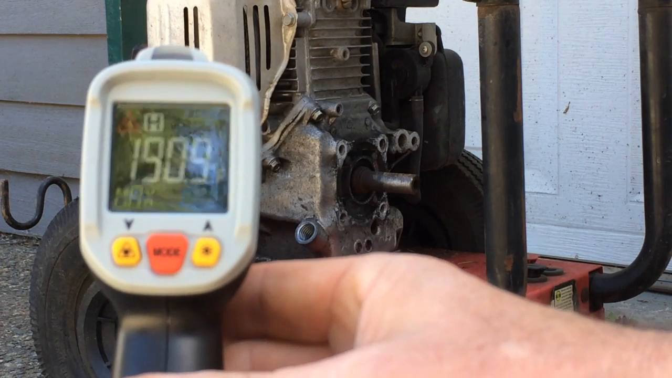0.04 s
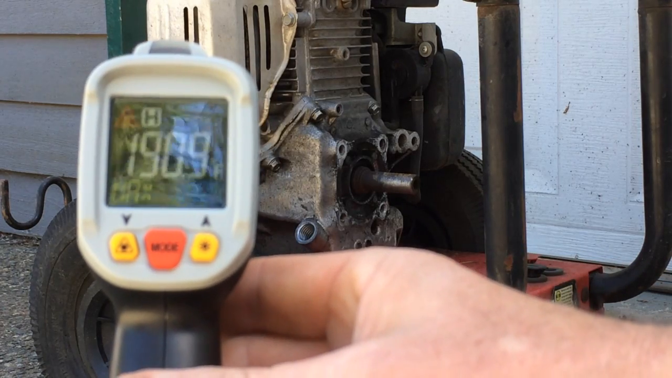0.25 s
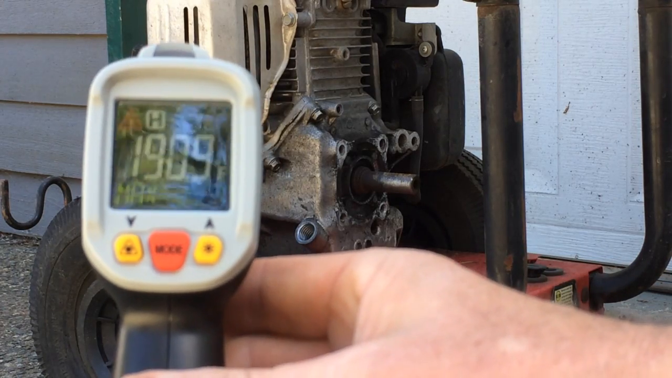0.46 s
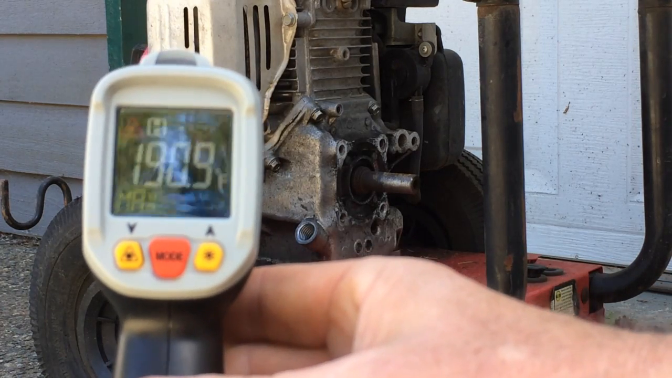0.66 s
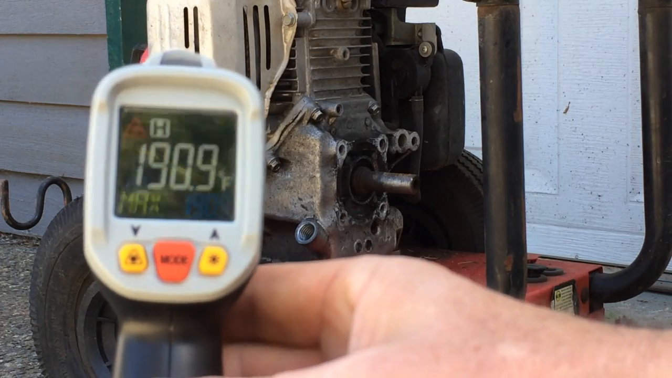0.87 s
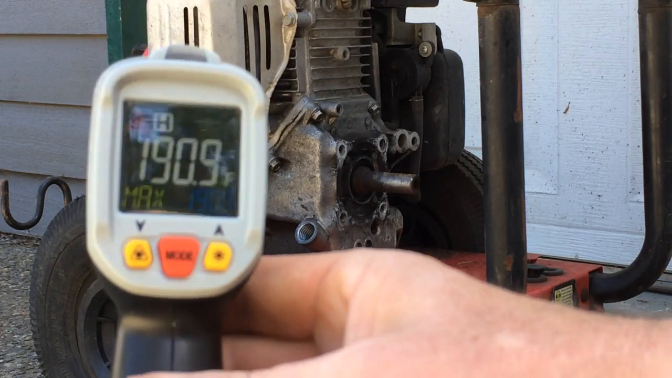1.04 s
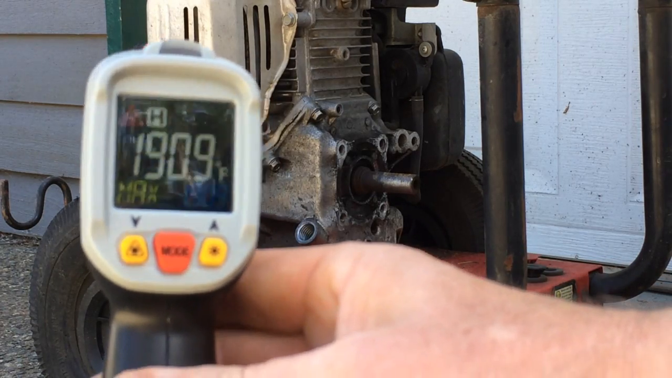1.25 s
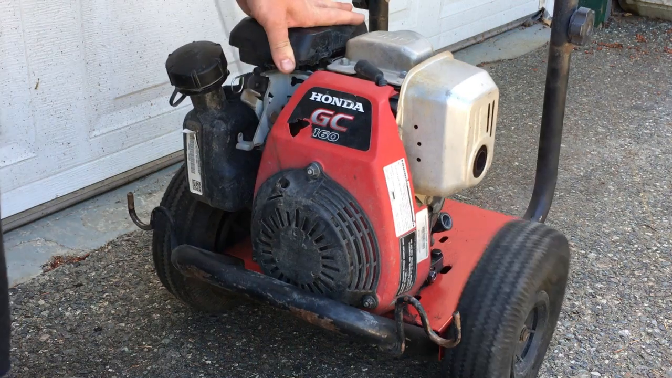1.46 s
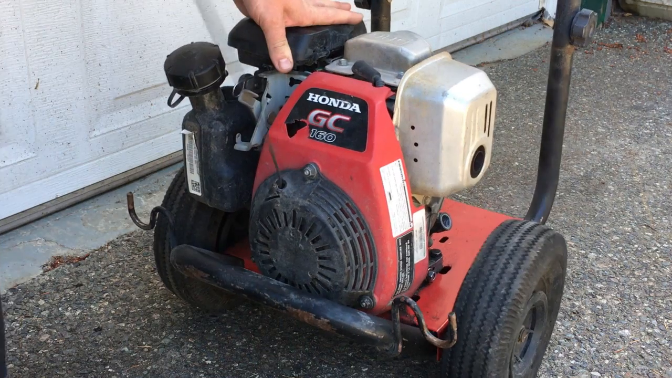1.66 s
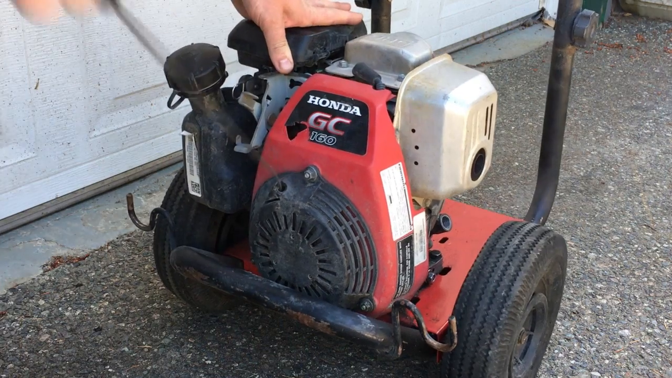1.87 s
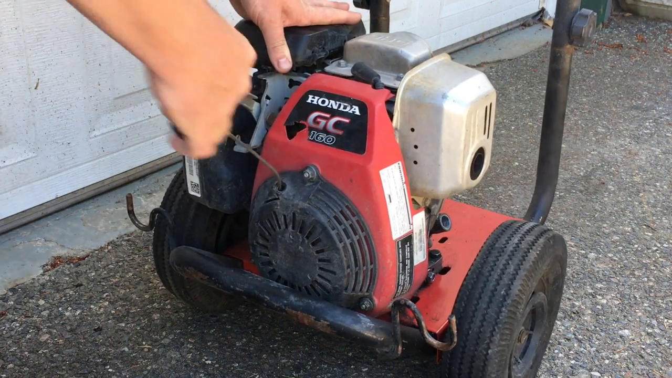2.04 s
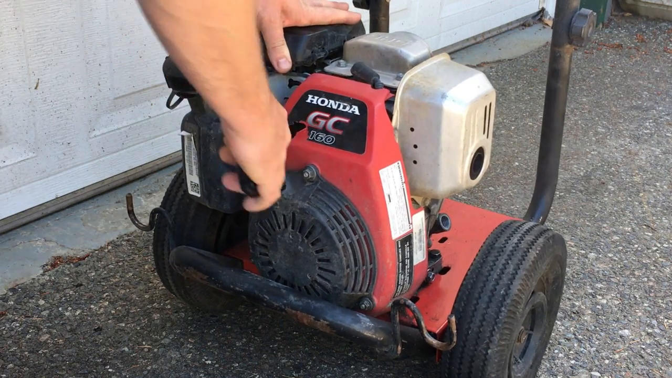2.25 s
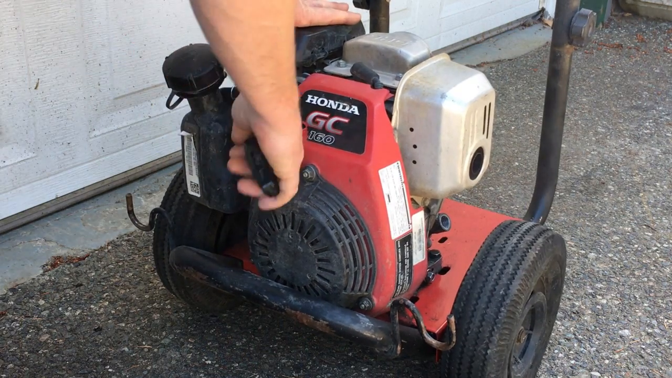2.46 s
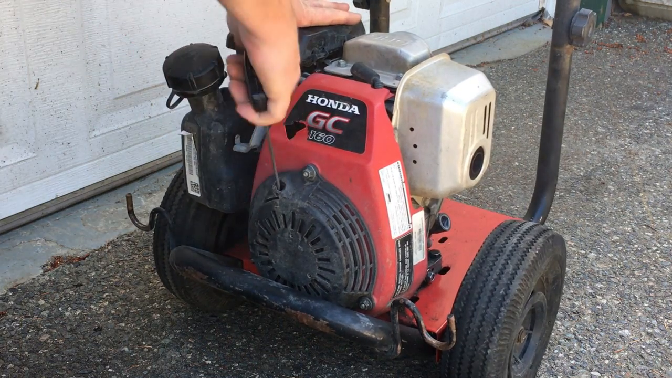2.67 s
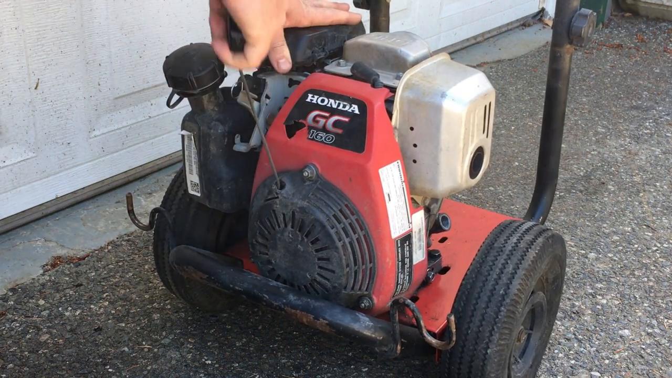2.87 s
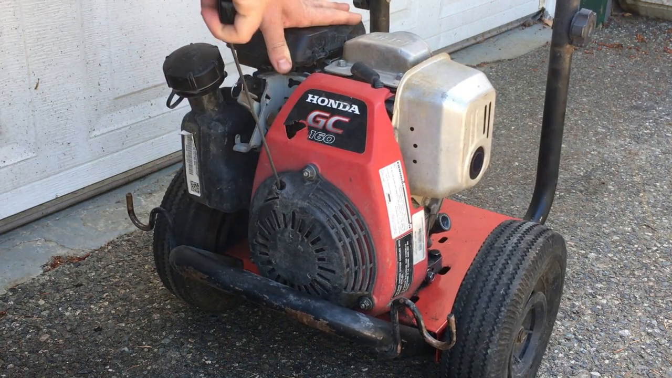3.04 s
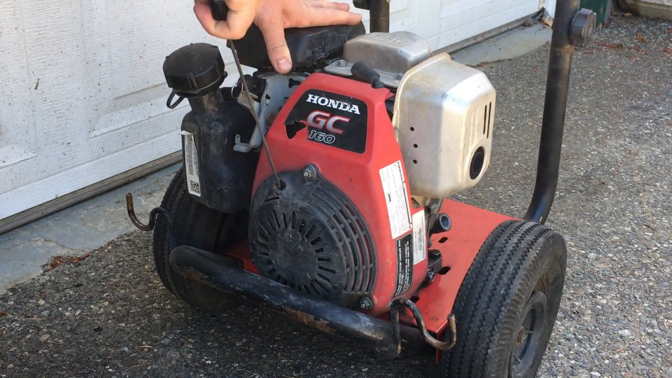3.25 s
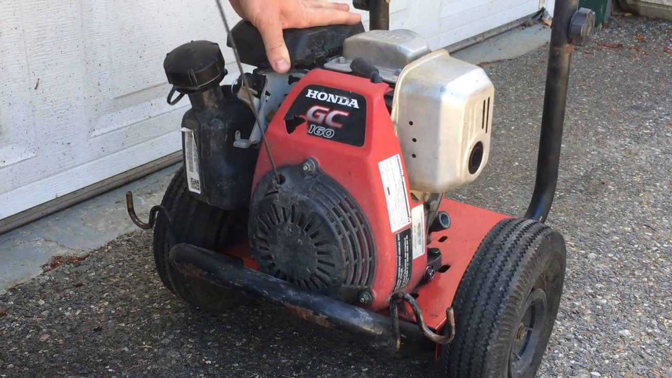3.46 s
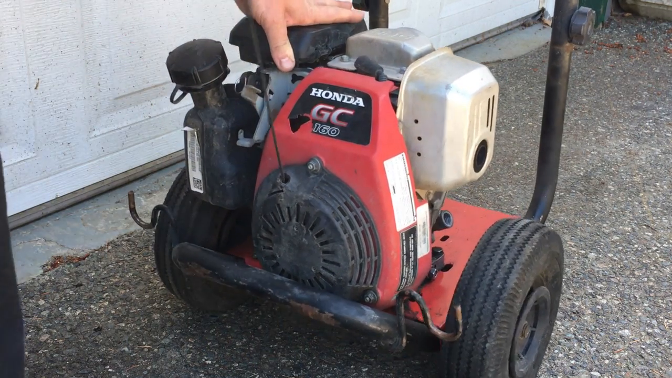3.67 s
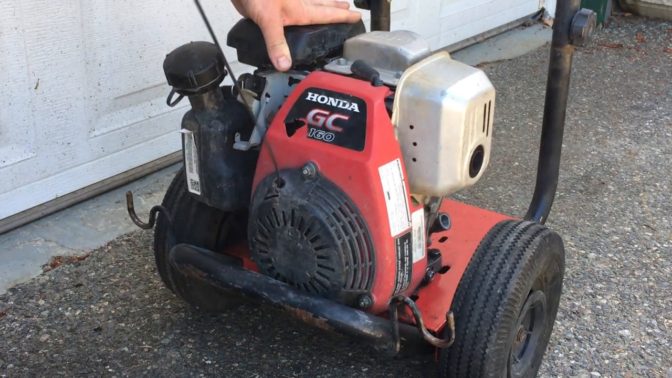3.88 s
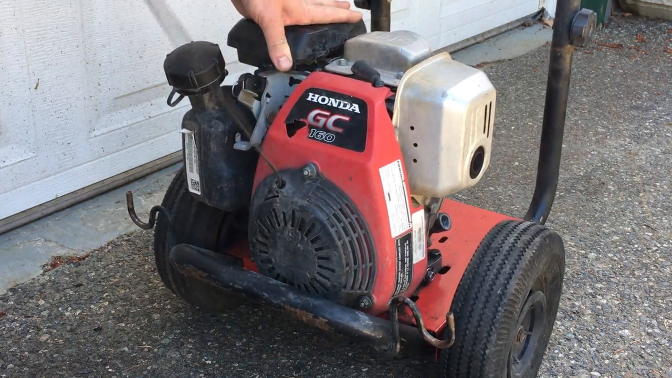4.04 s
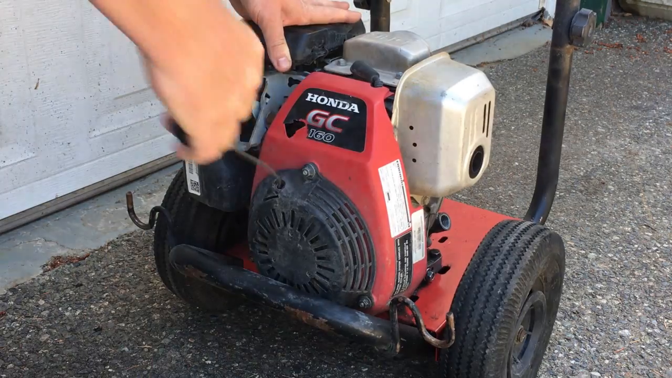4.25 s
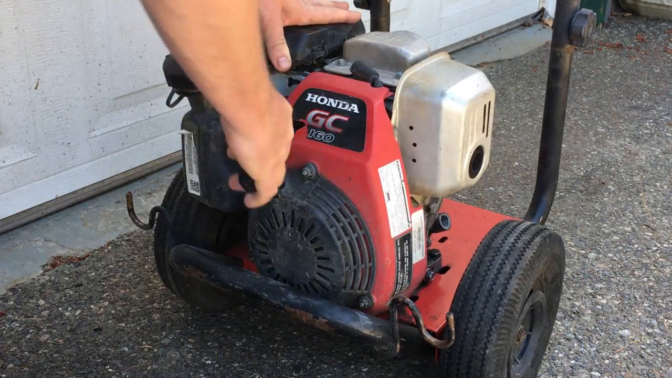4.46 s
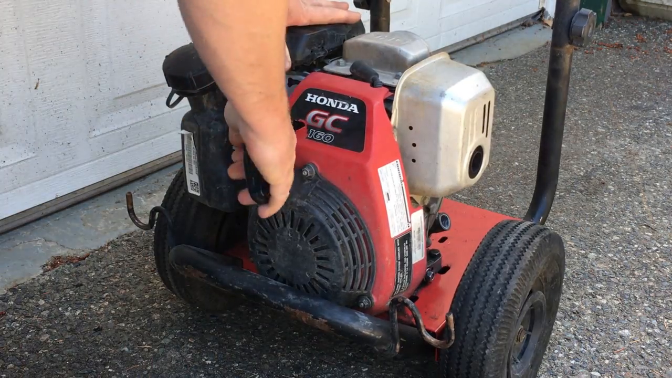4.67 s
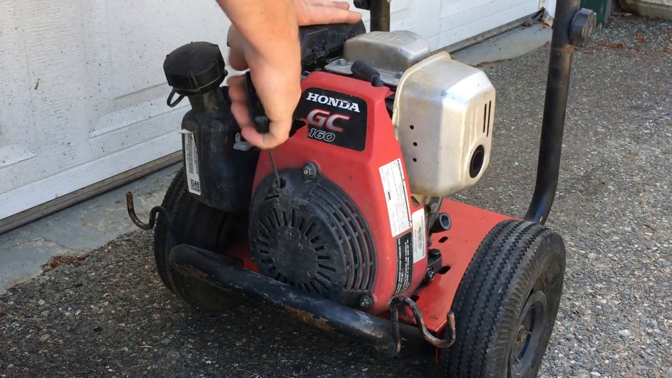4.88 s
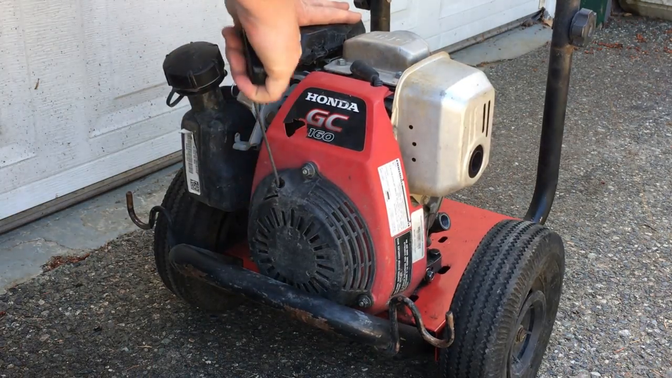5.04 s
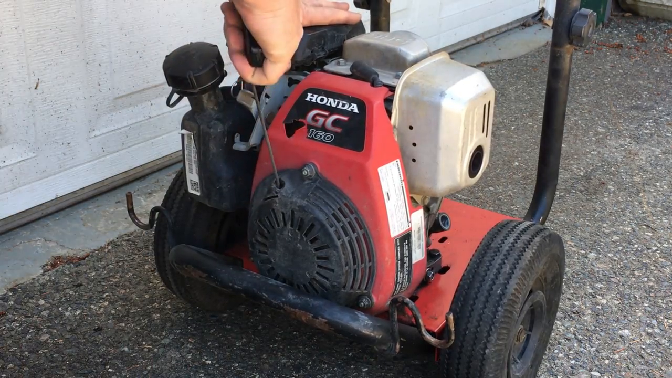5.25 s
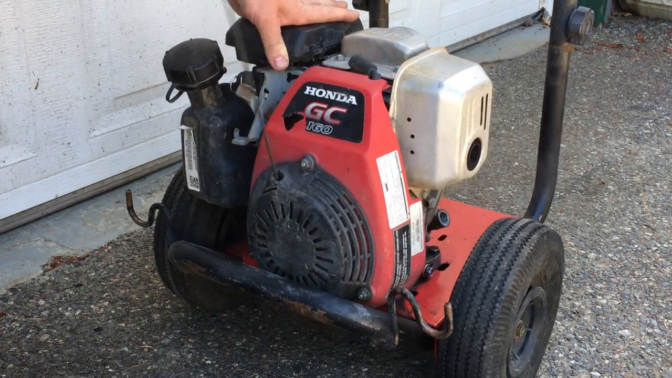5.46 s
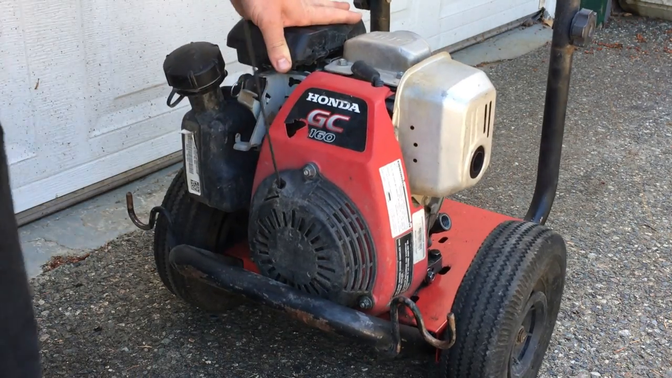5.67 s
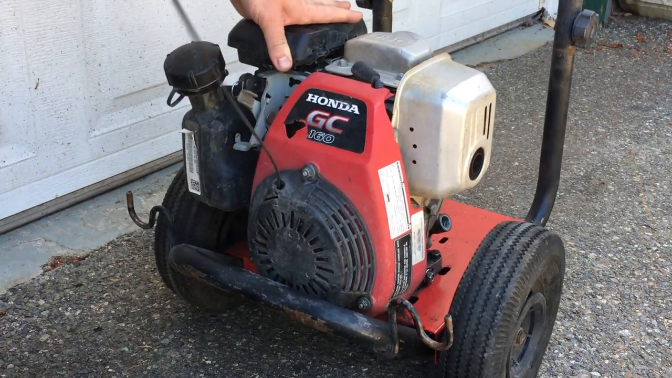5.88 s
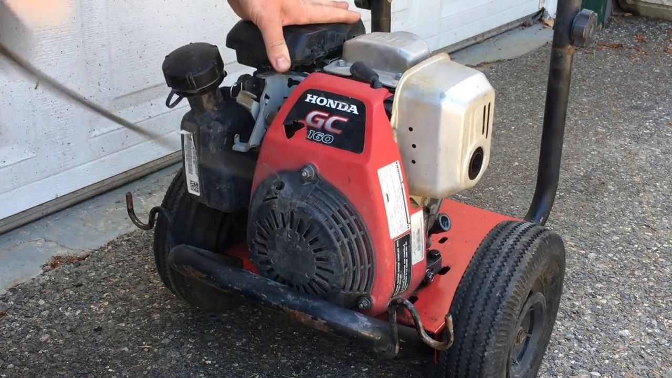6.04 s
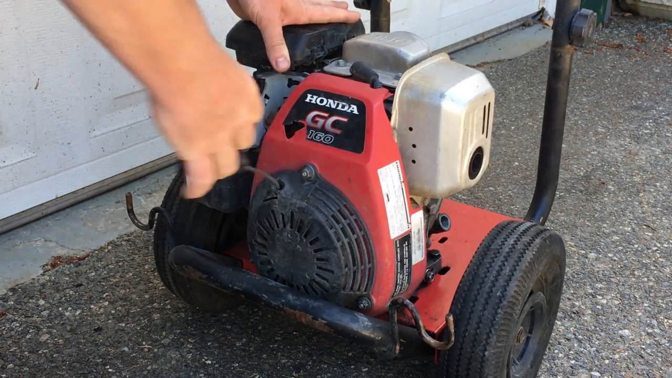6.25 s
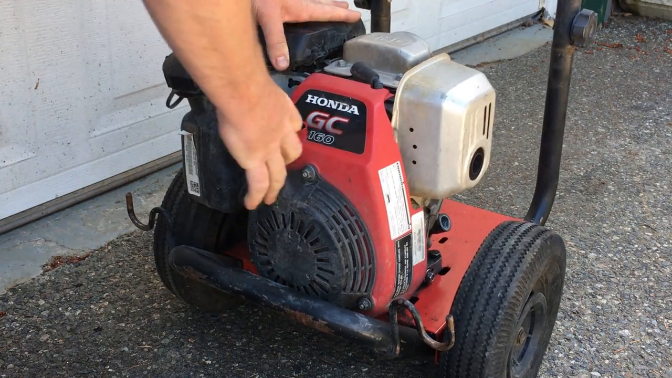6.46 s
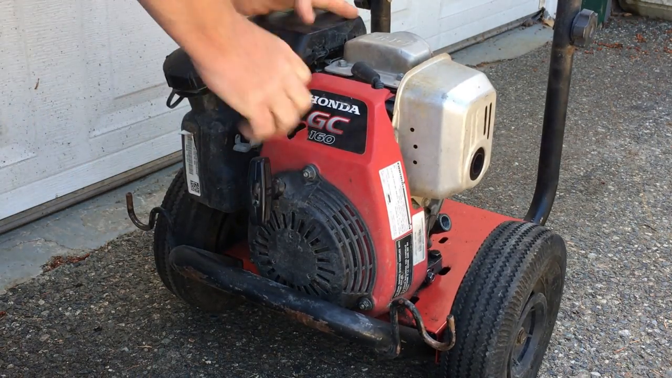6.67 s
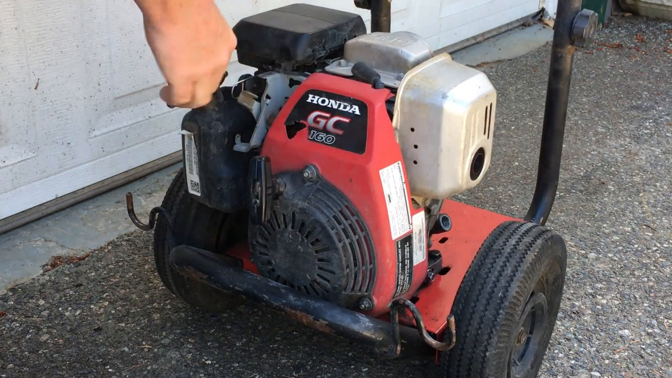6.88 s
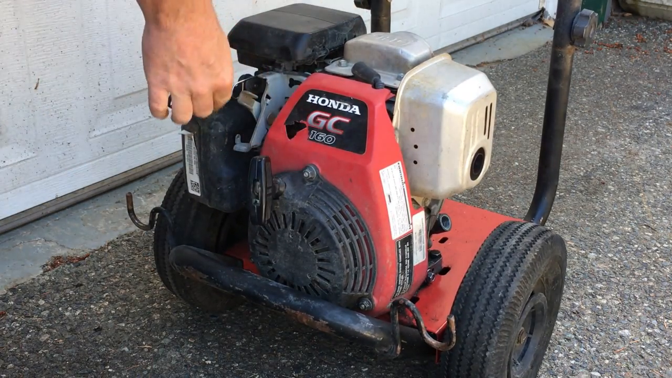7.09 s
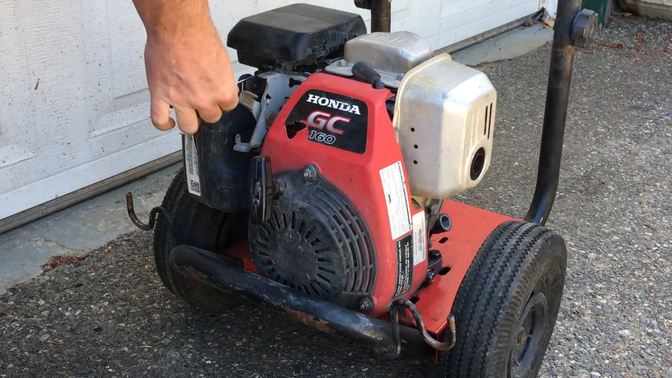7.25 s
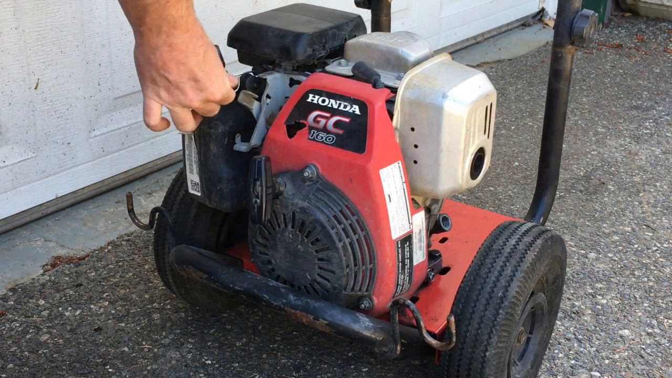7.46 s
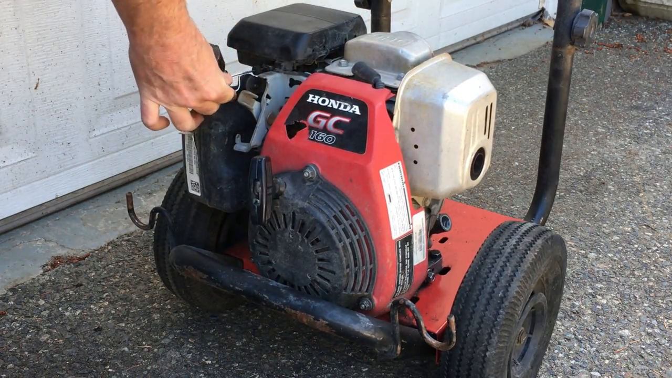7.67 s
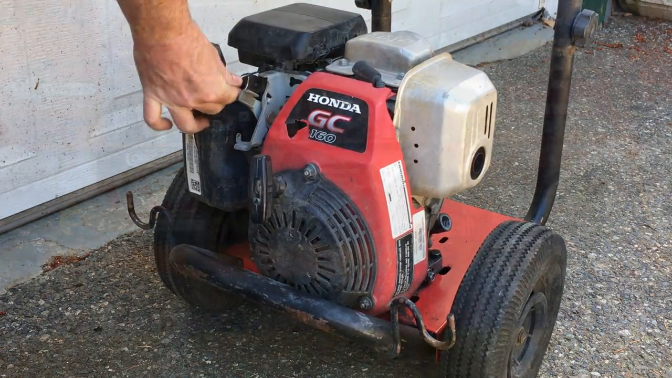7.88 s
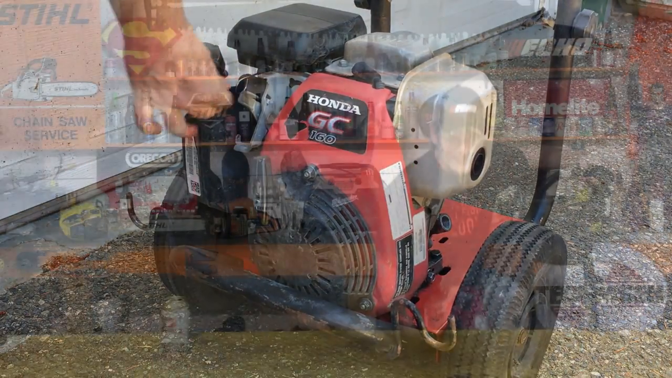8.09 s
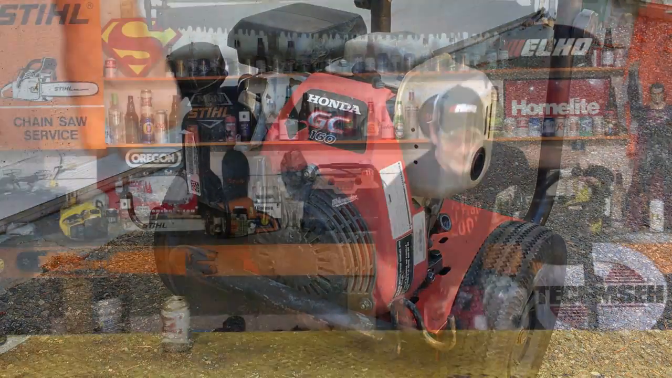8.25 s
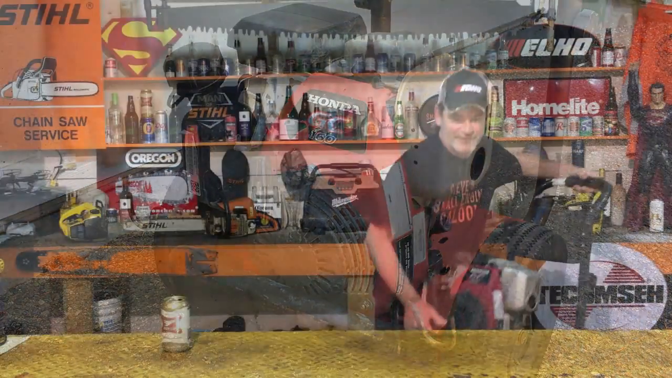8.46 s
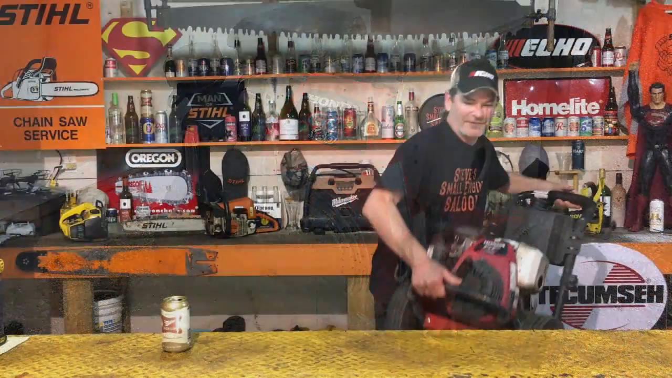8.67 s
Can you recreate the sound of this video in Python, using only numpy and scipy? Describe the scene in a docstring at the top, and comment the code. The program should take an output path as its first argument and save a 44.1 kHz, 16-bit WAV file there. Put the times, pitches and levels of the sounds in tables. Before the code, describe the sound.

A small petrol engine is yanked three times by its rope starter, clattering, chuffing and squealing without catching, over faint traffic outdoors.

```python
"""A small petrol engine on a steel cart is pulled over three times by its rope starter and does not catch.
Shaped noise makes shudder, housing rattle and rope scrape; damped sines make the piston's chuffs.
Pawls and valves clack as noise contacts ringing body modes; the rope reel squeals as a tone and octave.
A hand shifts the grip between pulls; the yard throws back a short wash.
Far traffic rumbles in filtered noise; at the end the yard fades out and the hush of a room fades in."""
import sys
import numpy as np
from scipy import signal
from scipy.fft import rfft, irfft, next_fast_len
from scipy.io import wavfile
from scipy.ndimage import uniform_filter1d, map_coordinates

SR = 44100
rng = np.random.default_rng(int(sys.argv[2]) if len(sys.argv) > 2 else 0)


def inscribe(sig):
    """Save sig as 16-bit PCM at rate SR to the path in sys.argv[1].

    A 1-D sig is mono; a 2-D sig holds one channel per row.
    Samples are clipped to [-1, 1] before scaling.
    """
    pcm = np.round(np.clip(np.atleast_2d(sig).T, -1, 1) * 32767)
    wavfile.write(sys.argv[1], SR, pcm.astype(np.int16))


def voltage_ratio(decibels):
    """Convert decibels (scalar or array-like) to amplitude ratios, 20 dB per decade."""
    exponent = np.asarray(decibels, float) / 20
    return 10 ** exponent


N = 384552
TIME = np.arange(N) / SR


def unit(x):
    """Scaled to rms 1."""
    return x / np.sqrt(np.mean(x ** 2) + 1e-20)


def curves(rows):
    """One value per sample for each column after the time; -150 outside the rows."""
    s, *columns = np.transpose(rows)
    return [np.interp(TIME, s, column, left=-150, right=-150) for column in columns]


def wobble(rate_hz):
    """A smooth random curve, rate_hz knots a second."""
    knots = rng.standard_normal(int(N * rate_hz / SR) + 4)
    return map_coordinates(knots, [TIME * rate_hz])


def coloured(x, spectrum):
    """x filtered through (Hz, dB) points on a log frequency axis; rms 1."""
    size = next_fast_len(N + 8192)
    hz, db = np.transpose(spectrum)
    bins_hz = np.fft.rfftfreq(size, 1 / SR)
    gain = voltage_ratio(np.interp(np.log(bins_hz + 1), np.log(hz + 1), db))
    return unit(irfft(rfft(x, size) * gain, size)[:N])


def noise(spectrum):
    """Steady noise of the given spectrum; rms 1."""
    return coloured(rng.standard_normal(N), spectrum)


def band(x, low_hz, high_hz):
    """A causal band-pass."""
    return signal.sosfilt(signal.butter(2, [low_hz, high_hz], "bandpass", fs=SR, output="sos"), x)


def grit(rate_hz, spread_db, life_s):
    """Noise roughened by random small contacts, each decaying with time constant life_s."""
    hits = (rng.random(N) < rate_hz / SR) * voltage_ratio(spread_db * rng.standard_normal(N))
    swell = signal.lfilter([1], [1, -np.exp(-1 / (life_s * SR))], hits)
    return rng.standard_normal(N) * (1 + swell)


# each pull swells and runs down: (time [s], turning engine level [dB], running rope level [dB])
PULLS = [
    [(1.37, -70, -69), (1.416, -44.5, -52.5), (1.464, -36.5, -38), (1.53, -36.5, -40), (1.63, -26, -27),
     (1.72, -30, -22.5), (1.8, -29, -36), (1.98, -30, -39), (2.12, -33.5, -42), (2.26, -45, -51),
     (2.58, -53.5, -60.5), (2.8, -64, -66.5)],
    [(3.58, -70, -74), (3.64, -46.5, -45), (3.72, -29, -34.5), (3.76, -31, -42), (3.83, -23, -36.5),
     (3.94, -36, -38.5), (4.07, -34.5, -41.5), (4.16, -43.5, -33), (4.37, -40, -42), (4.48, -52, -49),
     (4.67, -52, -62), (4.85, -66.5, -71.5)],
    [(5.62, -38, -41), (5.65, -42.5, -45), (5.72, -27, -31), (5.77, -30, -41.5), (5.82, -29, -35.5),
     (6, -31.5, -37.5), (6.14, -37.5, -35), (6.23, -38, -37), (6.39, -39.5, -46.5), (6.53, -48, -54),
     (6.71, -56, -64), (6.95, -76, -83)],
]
# cart, housing, rope guide and rope hiss spectra: (frequency [Hz], relative gain [dB])
SHUDDER = [(18, -54), (30, -14), (97, -0.5), (182, -4), (263, 0.5), (311, -5), (395, -8.5), (456, -19.5),
           (520, -31.5), (680, -55), (1140, -120)]
RATTLE = [(180, -19), (300, -14), (384, -9.5), (453, -31), (589, -1.5), (747, -5), (2000, -9),
          (3000, -19.5), (5000, -36), (16000, -75.5)]
SCRAPE = [(500, -47), (1200, -19), (2200, -4), (2720, -7.5), (4010, 1.5), (4970, -6.5), (6010, -4.5),
          (7500, -17.5), (9750, -40.5), (16500, -120)]
ROPE = [(3530, -34), (6000, -8), (7250, -11), (8570, 0.5), (10800, -9.5), (11700, -3.5), (16000, -21)]
LOUD_DB = -35  # pivot level of both growth laws
SHUDDER_OVER_DB, SHUDDER_DB_PER_DB = 0, 1.04  # shudder against rattle
HISS_UNDER_DB, HISS_DB_PER_DB = 6, 1.02  # rope hiss against scrape


def cranking():
    """The turning shaft shakes the cart, rattles the housing and scrapes the rope through its guide."""
    rattle_db, scrape_db = np.max([curves(pull) for pull in PULLS] + [hand()], axis=0)
    shudder_db = LOUD_DB + SHUDDER_OVER_DB + SHUDDER_DB_PER_DB * (rattle_db - LOUD_DB)
    rope_db = LOUD_DB - HISS_UNDER_DB + HISS_DB_PER_DB * (scrape_db - LOUD_DB)
    jolt_db = 2.2 * wobble(30)  # shared by rattle, scrape and hiss

    shudder = voltage_ratio(shudder_db + 2.7 * wobble(25)) * noise(SHUDDER)
    rattle = coloured(grit(rate_hz=70, spread_db=5, life_s=0.007), RATTLE)
    rattle = rattle + voltage_ratio(-8) * pings(300, 2500, rate_hz=30)
    rough = grit(rate_hz=110, spread_db=3, life_s=0.01)
    scrape = coloured(rough, SCRAPE) + voltage_ratio(-9) * pings(2500, 7000, rate_hz=30)
    rope = coloured(rough, ROPE) + voltage_ratio(-13) * pings(7000, 15000, rate_hz=30)

    rattle = voltage_ratio(rattle_db + 1.6 * wobble(16)) * rattle
    scrape = voltage_ratio(scrape_db + 1.5 * wobble(22)) * scrape
    return shudder + voltage_ratio(jolt_db) * (rattle + scrape + voltage_ratio(rope_db) * rope)


# short rubs as the hand shifts the grip or the rope snatches and slides:
# (start [s], end [s], housing level [dB], rope level [dB])
HAND = [(0.956, 0.969, -49, -49), (1.444, 1.468, -39, -34.5), (2.735, 3.126, -59.5, -62.5),
        (3.12, 3.349, -69, -70.5), (4.45, 4.524, -40.5, -46), (4.854, 5.43, -64, -68.5),
        (5.025, 5.15, -58.5, -56.5), (6.375, 6.419, -40.5, -35), (7.33, 7.503, -71, -73),
        (8.026, 8.399, -62.5, -71.5)]
HAND_EDGE_S = 0.012


def hand():
    """Housing and rope levels [dB] during the short rubs, with soft edges."""
    rubs = [voltage_ratio(np.array([[housing_db], [rope_db]])) * ((TIME > start) & (TIME < end))
            for start, end, housing_db, rope_db in HAND]
    soft = uniform_filter1d(np.max(rubs, axis=0), round(HAND_EDGE_S * SR), axis=1)
    return 20 * np.log10(np.abs(soft) + 1e-8)


# compression strokes and bumps of the cart:
# (time [s], level before CHUFF_GAIN_DB [dB], overtone before OVERTONE_GAIN_DB [dB])
CHUFFS = [(.997, -39.5, 8.5), (1.467, -15, -20), (1.588, -22.5, -2), (1.642, -5, -14), (1.761, -21, -17),
          (1.891, -17, -7.5), (2.002, -37, 10), (2.1, -24, -6), (2.5, -31, -6.5), (3.695, -31, 4),
          (3.802, -13.5, -7.5), (3.9, -36, 10.5), (4.031, -15, -22), (4.209, -32, 1), (4.313, -33, 1.5),
          (4.452, -47.5, 10.5), (5.69, -35, 3.5), (5.767, -13.5, -18), (5.935, -16, -10), (6.039, -33, 1),
          (6.142, -25, -7), (6.265, -42.5, 5), (6.557, -33, -10), (6.656, -50.5, 13.5), (8.139, -53, 5)]
CHUFF_GAIN_DB, OVERTONE_GAIN_DB = 9.5, 7.0
CHUFF_RISE_S, CHUFF_T60_S = 0.0047, 0.068
OVERTONE_T60_S = 0.099  # on top of the chuff's own decay


def chuffs():
    """Each stroke is a soft push that rings the muffler for a few cycles."""
    out, t = np.zeros(N + SR), TIME[:SR // 4]
    pitches = rng.normal(1, 0.086, (len(CHUFFS), 2))
    for (s, db, over_db), pitch in zip(CHUFFS, pitches):
        low = np.sin(2 * np.pi * 97 * pitch[0] * t)
        over = np.sin(2 * np.pi * 262 * pitch[1] * t) * voltage_ratio(-60 * t / OVERTONE_T60_S)
        muffler = low + voltage_ratio(over_db + OVERTONE_GAIN_DB) * over
        push = voltage_ratio(db + CHUFF_GAIN_DB - 60 * t / CHUFF_T60_S) * (1 - np.exp(-t / CHUFF_RISE_S))
        out[round(s * SR):][:len(t)] += push * muffler
    return out[:N]


# modes of housing, shroud and frame, also rung by clacks(): (frequency [Hz], level [dB], t60 [s])
BODY = [(393, 1, 0.071), (598.8, -0.5, 0.18), (798, -12.5, 0.18), (1107, -0.5, 0.19), (1220, -9.5, 0.052),
        (1490, -1.5, .14), (2175, -4, 0.11), (2310, 0.5, 0.1), (2880, -24.5, 0.017), (3678, -13.5, 0.12),
        (4346, -6, 0.046), (5600, -9, 0.053), (6185, -10, 0.036), (7470, -35.5, .05), (8370, -17, .06),
        (8680, 2, 0.13), (9360, 6.5, 0.15), (10180, -2.5, .05), (11040, 2.5, 0.1), (12850, -7, 0.023),
        (13350, -1.5, .05)]


def pings(low_hz, high_hz, rate_hz):
    """Loose parts tap single modes of the body at random moments; rms 1."""
    out = np.zeros(N)
    for hz, db, t60_s in BODY:
        taps = (rng.random(N) < rate_hz / SR) * rng.standard_normal(N)
        pole = voltage_ratio(-60 / (t60_s * SR)) * np.exp(2j * np.pi * hz / SR)
        ring = signal.lfilter([1], [1, -pole], taps).imag
        out += (low_hz < hz < high_hz) * voltage_ratio(db) * ring
    return unit(out)


# pawls, valves, grip and fittings striking:
# (time [s], middle part's peak [dB], housing re middle [dB], sizzle re middle [dB])
CLACKS = [(.606, -38, -32, -1), (.953, -39, -34, -8), (.974, -9.5, -20.5, -10.5), (.986, -11, -8, -19),
          (1.173, -50.5, 0, -15), (1.398, -41, -9, 2.5), (1.464, -20.5, -11, 3.5), (1.526, -11, -10, -4),
          (1.57, -21.5, -5.5, -14), (1.616, -7, -13.5, -16.5), (1.642, -4, -6, 1), (1.663, -7.5, 2, -7.5),
          (1.692, -8.5, -6, 7), (1.716, -8.5, -3.5, 2.5), (1.737, -12, -17, 0), (1.755, -8.5, -5.5, 0.5),
          (1.809, -20, -13, -30), (1.86, -17.5, -29, -16.5), (1.946, -17, -6, -1.5),
          (1.996, -17.5, -7, -13.5), (2.089, -14, 1, -6), (2.229, -32, 5.5, -20), (2.343, -16, -30, -2),
          (2.481, -42.5, 18, -14), (2.591, -40.5, 15, -11), (2.766, -33.5, -4, -10.5),
          (2.804, -23, -13, -24), (2.833, -14.5, -30, -5.5), (2.848, -15, -7.5, -20.5),
          (2.981, -31.5, -6, -7.5), (2.999, -31, -4, -17), (3.047, -44, 1, 2), (3.08, -34.5, -5, -32),
          (3.475, -50, -30, -29.5), (3.63, -36.5, 3, -7.5), (3.709, -20.5, 1.5, -10.5),
          (3.729, -6.5, -18, -13), (3.772, -12.5, 0.5, 1), (3.803, -9.5, -0.5, -23),
          (3.852, -18, -15.5, -8.5), (3.909, -23, -12, -11.5), (3.953, -13, 0, -6),
          (4.019, -11.5, 4.5, -24), (4.09, -14, -42, -19.5), (4.209, -23.5, -2, -18),
          (4.3, -26.5, 3, -30.5), (4.442, -40.5, 17, -7), (4.468, -29, 8, -12), (4.484, -24, -2.5, -5),
          (4.499, -29, 0, -25), (4.636, -46, 14.5, -14), (4.907, -41, -21, -21), (4.986, -41, -2, -10),
          (5.005, -32.5, -0.5, -5.5), (5.017, -22.5, -3, 1), (5.259, -42.5, 2, -9.5), (5.273, -33, -7, -15),
          (5.292, -34, -4.5, -22), (5.574, -9.5, 5.5, 5.5), (5.581, 1.5, -17, -12), (5.592, -6, -0.5, -5),
          (5.719, -7, -19, -20.5), (5.743, -20.5, -24, 4.5), (5.774, -16.5, 3, -20), (5.817, -19.5, -21, 2),
          (5.86, -16.5, -30, -21.5), (5.895, -16, -18, -29), (5.949, -18, 1.5, -16.5),
          (5.993, -19, -4, -11), (6.041, -12.5, -30, -29.5), (6.1, -26, 3.5, -18.5),
          (6.158, -17.5, 5, -19.5), (6.268, -21, -4, -22), (6.384, -13, -9.5, -9), (6.403, -14.5, -2, -6.5),
          (6.536, -41, 17.5, -16), (6.628, -33, -12, -5), (6.66, -37.5, 19.5, -15),
          (6.735, -43.5, 6, -18.5), (6.912, -47, 5.5, -5), (7.345, -53.5, 7, -19), (7.441, -45, -13, -4.5),
          (7.603, -49, 3, -29), (8.013, -57, 4, -22), (8.054, -36, 3.5, -1), (8.127, -54, 0, 5),
          (8.168, -33.5, -5, -11.5), (8.287, -44.5, 0.5, -0.5), (8.297, -40.5, -17, 0)]
# the body's ring, one row each for low, middle and high part: (level [dB])
RING_DB = [
    [-8.5],
    [-12.5],
    [-10.5],
]
CONTACT_S = 0.006
BLUR_T60_S = 0.072  # middle part; low 1.5 times, high 0.8 times as long


def clacks():
    """A chatter of contacts cracks and rings the body; three bands weigh differently each time."""
    out, t = np.zeros(N + SR), TIME[:SR // 6]
    hz, level_db, t60_s = np.transpose(BODY)[..., None]
    for s, db, housing_db, sizzle_db in CLACKS:
        u = t / CONTACT_S
        touch = u ** 0.48 * np.exp(-2.2 * u ** 2)  # pressure swells and lets go
        chatter = rng.standard_normal(len(t)) * voltage_ratio(1.8 * rng.standard_normal(len(t))) * touch

        mode_gain = voltage_ratio(level_db + rng.normal(0, 3.5, hz.shape) - 60 * t / t60_s)
        mode_hz = hz * rng.normal(1, 0.01, hz.shape)
        ring = np.sum(mode_gain * np.sin(2 * np.pi * mode_hz * t), axis=0)
        ring = voltage_ratio(np.array(RING_DB)) * ring / np.linalg.norm(ring)

        # countless small panel modes blur into a dying noise, longest in the low part
        blur_db = -60 * t / BLUR_T60_S / [[1.5], [1], [0.8]] + [[-26], [-31], [-31]]
        blur = rng.standard_normal((3, len(t))) * voltage_ratio(blur_db)
        response = ring + blur + (t == 0)  # last term: the direct crack
        blows = signal.fftconvolve(chatter[None], response, axes=1)[:, :len(t)]

        low = band(band(blows[0], 180, 1900), 180, 1900)
        middle = band(blows[1], 1600, 6200)
        high = band(blows[2], 4900, 14000)
        for part, part_db in ((low, housing_db), (middle, 0), (high, sizzle_db)):
            out[round(s * SR):][:len(t)] += voltage_ratio(db + part_db) * part / np.abs(part).max()
    return out[:N]


# reel squealing as the rope runs out or winds back:
# (time [s], pitch [Hz], level before flutter [dB], octave re tone before flutter [dB])
SQUEAL = [
    [(1.41, 988.5, -42, -8.5), (1.44, 1337, -34, -8.5), (1.465, 1500, -35, -4.5), (1.502, 1520, -48, 14.5),
     (1.574, 1760, -47.5, 22), (1.6, 1800, -49.5, 15)],
    [(3.655, 1904, -52, -2.5), (3.69, 2394, -23.5, 0), (3.7, 2533, -48, -14)],
    [(4.1, 2200, -27, -10), (4.135, 2820, -38, -5), (4.182, 3160, -22, 2), (4.205, 3234, -39, -3),
     (4.24, 2880, -34, 1), (4.33, 2135, -39, -12)],
    [(5.65, 2100, -38, -14.5), (5.71, 3598, -38, -19), (5.775, 3893, -47, -21), (5.79, 4020, -18, -23),
     (5.82, 4350, -45, -22), (5.845, 3880, -33, -20), (5.865, 4014, -21, -17), (5.885, 3980, -33, -20),
     (5.93, 3122, -32, -21)],
    [(6.05, 2167, -26, -12), (6.085, 2522, -43, -12), (6.115, 3086, -28, -10), (6.16, 3480, -22, -10),
     (6.19, 3770, -24.5, -22), (6.24, 3060, -36, -14), (6.28, 2632, -27, -12), (6.3, 2500, -30, -10.5)],
]


def squeal():
    """A broken stick-slip tone and its octave, gliding and jittering in pitch."""
    out = np.zeros(N)
    for rows in SQUEAL:
        hz, db, octave_db = curves(rows)
        phase = 2 * np.pi * np.cumsum(hz * (1 + 0.022 * wobble(300))) / SR
        grip = voltage_ratio(3.5 * wobble(60) - 4)
        slip = voltage_ratio(4 * wobble(40) - 3)
        octave = voltage_ratio(octave_db) * slip * np.sin(2 * phase)
        out += voltage_ratio(db) * grip * (np.sin(phase) + octave)
    return out


def yard(x):
    """A garage door and the paving throw back a short wash that loses its treble first."""
    t = TIME[:SR // 3]
    dull = band(rng.standard_normal(len(t)), 180, 3000) * voltage_ratio(-60 * t / 0.22)
    bright = band(rng.standard_normal(len(t)), 2800, 13000) * voltage_ratio(-60 * t / 0.17)
    tail = (dull + 0.91 * bright) * (t > 0.006)
    return signal.fftconvolve(x, tail / np.linalg.norm(tail))[:N]


# outdoor bed: (time [s], traffic level [dB], air level [dB])
YARD = [(0, -54, -61.5), (1.3, -51.5, -63), (3.4, -49, -63.5), (5.5, -50, -61), (7.2, -49.5, -62.5),
        (8.72, -55.5, -64.5)]
# road rumble and open air spectra: (frequency [Hz], relative gain [dB])
TRAFFIC = [(15, -45.5), (25, -2.5), (75, 4), (141, -7.5), (227, -18), (289, -19), (400, -20.5), (520, -49),
           (880, -120)]
AIR = [(120, -31.5), (200, -4), (289, -16), (328, -12), (491, -11.5), (1450, -16.5), (1620, -20),
       (3250, -28.5), (3970, -30), (16000, -40)]


def traffic():
    """Distant road rumble in lumps over a smooth wash of open air, both filtered noise."""
    traffic_db, air_db = curves(YARD)
    rumble = voltage_ratio(traffic_db + 1.5 * wobble(13)) * noise(TRAFFIC)
    air = voltage_ratio(air_db + 0.4 * wobble(6.7)) * noise(AIR)
    return rumble + air


# room hush spectrum: (frequency [Hz], relative gain [dB])
HUSH = [(18, -33), (30, -4), (75, -9), (750, -11), (3200, -17.5), (16000, -37.5)]
# room fading in: (time [s], level [dB])
FADE_IN = [(8.425, -77.5), (8.48, -66), (8.56, -61.5), (8.67, -59.5), (8.72, -54)]


def room_hush():
    """The quiet of a room: filtered noise fading in at the end."""
    return voltage_ratio(curves(FADE_IN)[0]) * noise(HUSH)


# yard fading out: (time [s], linear gain [1])
FADE_OUT = [(8.22, 1), (8.415, 0.012)]


def scene():
    """The engine in the yard, fading into the room."""
    engine = cranking() + chuffs() + clacks() + squeal()
    outdoors = engine + voltage_ratio(-16.0) * yard(engine) + traffic()
    gain = np.clip(np.interp(TIME, *np.transpose(FADE_OUT)), 0, 1)
    return (gain * outdoors + room_hush())[None]


def top_cut(x):
    """Nothing passes above the cut-off."""
    return signal.sosfilt(signal.butter(12, 16800, fs=SR, output="sos"), x)


def record(dry):
    """The microphone drops the deepest bass; the input saturates softly near full scale."""
    x = signal.sosfilt(signal.butter(2, 38, "highpass", fs=SR, output="sos"), dry)
    mix = x / (1 + np.abs(x) ** 6) ** (1 / 6)
    return top_cut(mix)


dry = scene()
out = record(dry)
inscribe(out)
```